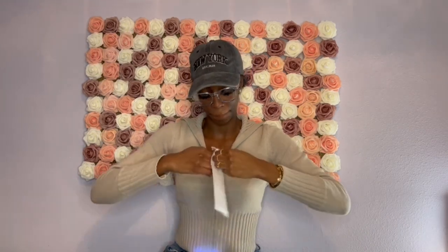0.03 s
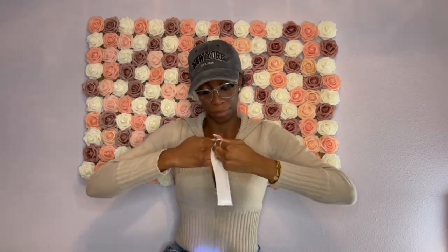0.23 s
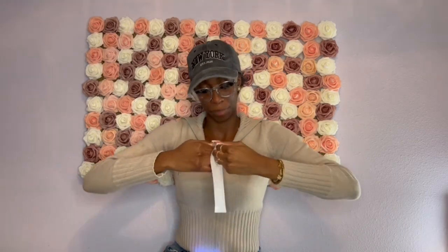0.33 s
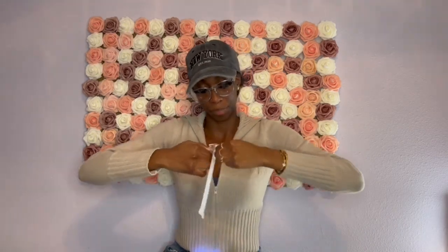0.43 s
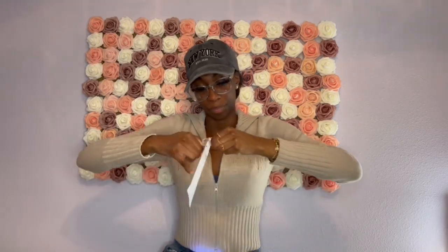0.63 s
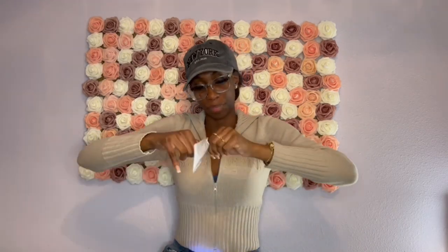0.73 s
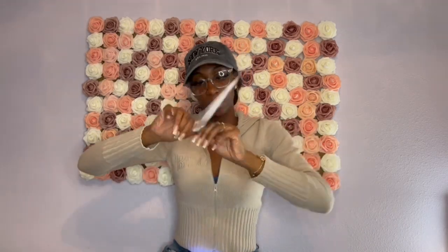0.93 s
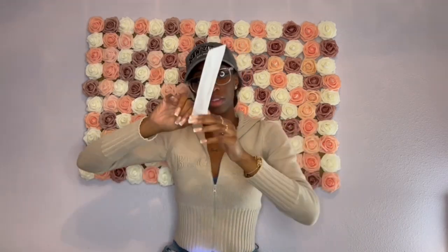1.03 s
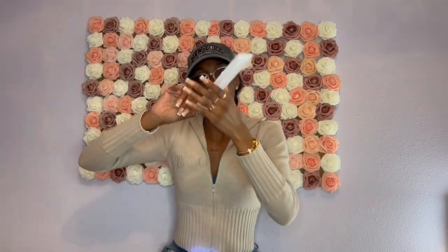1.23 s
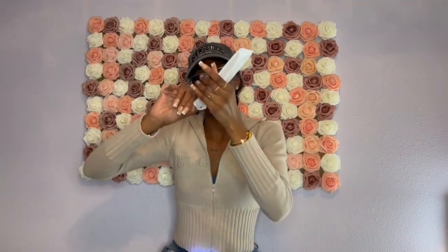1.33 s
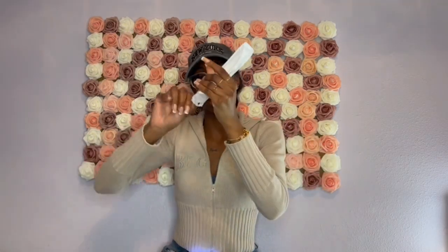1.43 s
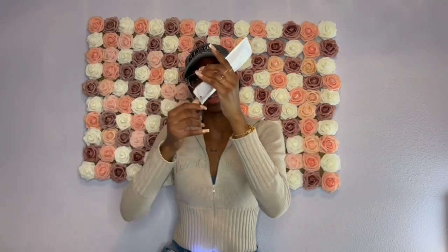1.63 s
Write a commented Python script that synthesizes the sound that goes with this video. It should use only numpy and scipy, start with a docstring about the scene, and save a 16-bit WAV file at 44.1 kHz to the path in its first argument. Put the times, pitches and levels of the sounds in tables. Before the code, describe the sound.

A small stiff plastic packet crinkles in the hands, with light ticks before a loud double snap at 0.23 seconds. More crisp snaps come around 0.46 and from 0.66 to 0.88, then it quiets to faint crackle. From 1.19 to 1.37 dense crunches and rustling build, a sharp snap follows at 1.41, and small dull ticks fade by 1.65. Close stereo, short room tail, faint hiss and low rumble.

```python
"""Plastic packet pulled open

Two hands pull a small packet of stiff film open in a small, bare room, heard by two microphones.
The film buckles in sharp ringing snaps, gives way in crunches made of dense clicks, and rustles
under the fingers as a stream of tiny ringing slips; near the end it scrapes as it is pulled apart.
Near reflections and a short noise tail answer each snap, over filtered-noise hiss and a low rumble."""
import sys
import numpy as np
from scipy import signal
from scipy.fft import rfft
from scipy.io import wavfile
from scipy.ndimage import uniform_filter1d

SR = 44100
rng = np.random.default_rng(int(sys.argv[2]) if len(sys.argv) > 2 else 0)


def unload_audio(sound):
    """Save the sound as a 16-bit wav file, at the path given as the first command line argument."""
    columns = np.transpose(np.atleast_2d(sound))
    # keep every value between -1 and 1, then stretch to whole-number steps
    steps = np.round(np.clip(columns, -1, 1) * 32767)
    wavfile.write(sys.argv[1], SR, steps.astype(np.int16))


N = 74970  # length in samples
HZ = np.fft.rfftfreq(4096, 1 / SR)  # frequency grid for all colours

# Single buckles of the film; the ring is a peak in the spectrum:
# start_s, level_db, pitch_hz, ring_db, width_octaves, bass_db, treble_db_per_octave
FILM_SNAPS = [(0.1262, -14, 5260, 18.5, 1, 11, 15), (.161, -20.5, 5950, 7.5, 0.98, -12, 7),
              (0.1941, -22, 3610, 13, 0.44, -1, -12), (0.23, 0.5, 2900, 9.5, 0.42, 1, 7),
              (0.2352, 0, 3400, 6.5, 0.15, -11, -8.5), (0.2405, -5.5, 6030, 16.5, 0.22, -14, 8),
              (0.364, -30.5, 5040, 4, 0.81, 7, -5), (0.3896, -33, 2520, -3, .6, -3, -12),
              (0.4331, -25.5, 5000, 6, 1, 12, -16), (0.4645, -7, 4050, 9, 0.54, -10, 2),
              (0.468, -13.5, 2470, 10, 0.42, -8.5, -3), (0.6125, -37.5, 3960, 9, 0.64, 0, -1),
              (0.6332, -34.5, 1720, 12, 0.83, 14, -18), (0.6597, -16, 3320, 15, 0.4, 1, -17),
              (0.6597, -17, 2320, 14, .5, -13, -17), (0.7108, -7, 6200, 9.5, 1, -2, 5),
              (0.7954, -7.5, 2920, 7.5, 0.17, -3.5, -5.5), (0.8286, -15, 2790, 21, 0.27, 20, -3),
              (0.848, -18.5, 2840, 18, 0.64, 14, -10), (0.8806, -23, 4000, 28, 0.66, 9, -23),
              (1.1902, -21.5, 3490, 4.5, 0.35, -1, -13), (1.4065, -5, 2300, 3, 0.19, -18, -14.5),
              (1.408, -12, 4260, 7, 0.36, -9, -15.5), (1.4145, -15.5, 3640, 8, 0.86, -1, -7),
              (1.4818, -17.5, 1900, 11, 0.53, 13, -13), (1.5755, -29.5, 2180, 12, 1, 12, -27),
              (1.5869, -21, 4000, 10.5, 0.27, -2.5, -34), (1.626, -27.5, 3160, 10.5, 0.32, -13, -40)]
# Quick runs of tiny creases: start_s, length_s, level_db, bass_db, treble_db_per_octave
CREASE_RUNS = [(0.038, 0.0093, -20.5, 9, 0.5), (0.4622, 0.0017, -16, 2, 5), (0.7938, 0.0031, -15.5, 17, 2),
               (0.8256, 0.0041, -13.5, -6, 3), (0.833, 0.0033, -21, -2, -19),
               (1.014, 0.021, -31.5, -14, -23), (1.062, 0.0065, -28.5, 22.5, 1),
               (1.193, 0.012, -19, -28, -6.5), (1.2428, 0.0082, -10.5, 13, -0.5),
               (1.253, 0.001, -11.5, -8, 3), (1.262, 0.0052, -18.5, -5, 0), (1.29, 0.0046, -10, 16, 1),
               (1.32, 0.0055, -5.5, 8, 0.5), (1.3273, 0.0017, -12.5, 13, -21),
               (1.365, 0.0031, -17, -15, -48)]
# Broad colour shared by snaps and crunches, strongest at 2 to 8 kHz,
# with narrow dips in the treble: frequency_hz, level_db
SHARED_COLOUR = [(60, -16), (200, -14.5), (400, -7), (600, -11), (1000, -4.5), (2000, 3), (3500, 2),
                 (6500, 1), (8500, -0.5), (10300, -9.5), (12200, 1), (13800, -22.5), (15500, 0.5),
                 (17000, -52)]
BASS_HZ, TREBLE_HZ = 834, 6750  # corners of the bass and treble tilts

# Burst of tiny creases round each snap: the burst starts ahead of the main click
SPLINTER_S, SPLINTER_LEAD_S = 0.0012, 0.0003
SPLINTER_SHARE = 3.7  # burst strength against the click, for a facet with a 0 dB ring
CLEAN_DB_PER_DB = 0.4  # the more a facet rings, the less it splinters
CREASES_PER_S, CREASE_SPREAD_DB = 2700, 3.5

# Film rustling under the fingers, level over time: start_s, level_db
RUSTLE_LEVELS = [(0, -42.5), (.03, -56), (.1, -60.5), (.17, -69), (.22, -51.5), (.34, -86), (.45, -58.5),
                 (.55, -88), (.64, -62), (.77, -56.5), (.91, -75), (.95, -56.5), (1.0, -100),
                 (1.066, -52.5), (1.09, -86), (1.18, -81), (1.2, -51.5), (1.23, -52.5), (1.27, -40),
                 (1.35, -53), (1.39, -56), (1.56, -68.5), (1.7, -65)]
# Colour of the rustle: frequency_hz, level_db
RUSTLE_TONE = [(100, -29), (400, -5.5), (1000, 0.5), (2000, 0.5), (4000, 5), (6500, 5), (9000, -9.5),
               (12000, -23), (16000, -17.5)]
RUSTLE_PER_S, RUSTLE_SPREAD_DB = 4900, 4.5
# Duller scraping of film and fingers, level over time: start_s, level_db
SCRAPE_LEVELS = [(0, -61.5), (.11, -60.5), (.16, -77), (.35, -67), (.38, -52.5), (.45, -86), (.57, -78),
                 (.7, -58.5), (.78, -70), (.84, -50), (.9, -64), (1.07, -64), (1.12, -89), (1.235, -79),
                 (1.26, -67), (1.33, -47), (1.39, -68.5), (1.48, -61), (1.55, -53.5), (1.62, -78),
                 (1.7, -68.5)]
# Colour of the scrape: frequency_hz, level_db
SCRAPE_TONE = [(60, -7), (160, 5), (290, -4), (410, 6), (590, 3), (830, 1), (1600, 4.5), (3000, -1),
               (7000, -8), (16000, -43)]
SCRAPE_PER_S, SCRAPE_SPREAD_DB = 4400, 4
GRAIN_HZ, GRAIN_CYCLES = (125.3, 14630), 1.94  # pitch range of the slips, cycles to decay to 1/e

# Nearby surfaces: delay_s, level_db
NEAR_ECHOES = [(.0028, -4), (.0085, -14), (0.0105, -8)]
ECHO_SCATTER_S = 0.0014
# Decay of the diffuse tail: frequency_hz, t60_s
ROOM_DECAY = [(150, 0.52), (500, 0.18), (1200, 0.29), (3000, 0.18), (7000, .23), (15000, 0.086)]
ROOM_DB, ROOM_BUILD_S = -2, 0.0035  # tail level before evening, time to build up
# How alike the tail is at the two microphones: frequency_hz, likeness (0 to 1)
TAIL_LIKENESS = [(330, 0.99), (650, 0.023)]

# Colour of the room hiss: frequency_hz, level_db
HISS_COLOUR = [(20, -13), (50, -4), (85, -3), (130, -11), (300, -14.5), (700, -25.5), (2000, -17.5),
               (6000, -49), (10000, -37), (17000, -40)]
HISS_DB, HISS_SIDE = -72.5, 0.62  # rms level of the middle, side against middle
# Swells of the low rumble: start_s, level_db
RUMBLE_LEVELS = [(0, -66), (.15, -76), (.26, -69.5), (.55, -85), (0.621, -62.5), (.69, -81), (.76, -67),
                 (.9, -73), (1.079, -71), (1.3, -78), (1.38, -62), (1.5, -71.5), (1.7, -75)]
# Colour of the rumble: frequency_hz, level_db
RUMBLE_TONE = [(20, -39), (38, -13.5), (57, 9), (80, 1), (130, -13.5), (400, -54)]

# Balance of the microphones: frequency_hz, left_minus_right_db
LEFT_BALANCE = [(100, 1), (700, 0.3), (1300, 3.5), (3100, 0.5), (4300, 4.5), (6000, 10), (8000, 4.5),
                (12000, -0.5), (16000, -7)]
RIGHT_LAG_SAMPLES, EDGE_HZ = 2, 16600  # right delay, upper band limit


def snaps():
    """A facet pops through and rings for a few cycles, amid a splinter of tiny creases."""
    out = np.zeros(N)
    t = np.arange(512) / SR
    for start_s, level_db, pitch_hz, ring_db, width_octaves, bass_db, treble_db in FILM_SNAPS:
        splinter = unit(rng.standard_normal(len(t)) * t * np.exp(-2 * t / SPLINTER_S))
        push = SPLINTER_SHARE * amp(-CLEAN_DB_PER_DB * ring_db) * splinter
        add(push, SPLINTER_LEAD_S, np.array([-1.]))  # the main click
        octaves_away = np.log2((HZ + 1) / pitch_hz)
        facet_db = ring_db * np.exp(-(octaves_away / width_octaves) ** 2)
        body = ring(tilted_colour(bass_db, treble_db) + facet_db)
        snap = signal.fftconvolve(evened(push, size=90), body)
        add(out, start_s - SPLINTER_LEAD_S, amp(level_db) * unit(snap))
    return out


def crunches():
    """A fold gives way in a brief run of dense creases that swells and dies away."""
    out = np.zeros(N)
    t = np.arange(2048) / SR
    for start_s, length_s, level_db, bass_db, treble_db in CREASE_RUNS:
        swell = np.sqrt(t) * np.exp(-2 * (t / length_s) ** 2)
        run = creases(len(t), CREASES_PER_S, CREASE_SPREAD_DB) * swell
        crunch = signal.fftconvolve(evened(run, size=60), ring(tilted_colour(bass_db, treble_db)))
        add(out, start_s, amp(level_db) * unit(crunch))
    return out


def tilted_colour(bass_db, treble_db):
    """Shared colour in dB with its own tilts: large folds add bass, tight ones treble."""
    bass = bass_db / (1 + (HZ / BASS_HZ) ** 2)
    treble = treble_db * np.log2(np.hypot(1, HZ / TREBLE_HZ))
    return read(SHARED_COLOUR) + bass + treble


def creases(n, per_s, spread_db):
    """Film gives way in random clicks of either sign, a few much larger than the rest."""
    size = amp(spread_db * np.minimum(rng.exponential(1, n), 4))
    return size * rng.choice([-1, 1], n) * (rng.random(n) < per_s / SR)


def friction(levels, colour, per_s, spread_db, count=24):
    """Rubbing is a stream of small slips that ring at count pitches and follow the hands' levels."""
    t = np.arange(2048) / SR
    slips = np.zeros(N)
    for hz in np.geomspace(*GRAIN_HZ, count):
        grain = np.sin(2 * np.pi * hz * t) * np.exp(-hz * t / GRAIN_CYCLES)
        clicks = creases(N, per_s / count, spread_db)
        slips += np.sqrt(hz) * unit(signal.oaconvolve(clicks, grain)[:N])
    coloured = signal.fftconvolve(slips, ring(read(colour)))[:N]
    return level_curve(levels) * np.sqrt(N) * unit(coloured)


def rustle():
    """Film rubs under the fingers in bright, dense slips."""
    return friction(RUSTLE_LEVELS, RUSTLE_TONE, RUSTLE_PER_S, RUSTLE_SPREAD_DB)


def scrape():
    """Film and fingers scrape in duller slips."""
    return friction(SCRAPE_LEVELS, SCRAPE_TONE, SCRAPE_PER_S, SCRAPE_SPREAD_DB)


def room_tails(age):
    """Diffuse tails at two microphones: noise dying at its own rate per pitch, more alike in the bass."""
    clicks = rng.choice([-1., 1.], (2, len(age)))
    hz, t, (a, b) = signal.stft(clicks, SR, nperseg=256)
    same = np.clip(read(TAIL_LIKENESS, hz), 0, 1)[:, None]
    pair = np.array([a, same * a + np.sqrt(1 - same ** 2) * b])
    decay = amp(-60 * t / read(ROOM_DECAY, hz)[:, None])
    return signal.istft(pair * decay, SR)[1][:, :len(age)]


def room(x):
    """Direct sound, a few scattered near reflections and a short diffuse tail, at two microphones."""
    age = np.arange(SR // 2) / SR
    out = []
    for tail in room_tails(age):
        response = amp(ROOM_DB) * unit(tail * (1 - np.exp(-age / ROOM_BUILD_S)))
        response[0] += 1  # direct sound
        for delay_s, level_db in NEAR_ECHOES:
            scatter = unit(rng.standard_normal(len(age)) * np.exp(-age / ECHO_SCATTER_S))
            add(response, delay_s, amp(level_db) * scatter)
        out.append(signal.fftconvolve(x, evened(response, size=18))[:N])
    return np.array(out)


def hiss():
    """Faint steady room noise, partly different on the two sides."""
    mid = noise(HISS_COLOUR)
    side = HISS_SIDE * noise(HISS_COLOUR)
    return amp(HISS_DB) * np.array([mid + side, mid - side])


def rumble():
    """Low noise that swells and sinks, the same on both sides."""
    return level_curve(RUMBLE_LEVELS) * noise(RUMBLE_TONE)


def noise(colour):
    """Steady noise of the given colour, rms one."""
    return np.sqrt(N) * unit(signal.fftconvolve(rng.standard_normal(N), ring(read(colour)))[:N])


def evened(x, size):
    """Flattens the broad colour of a burst (over size bins), keeps its fine grain, energy one."""
    power = uniform_filter1d(abs(rfft(x, 8 * 4096)) ** 2, 8 * size)[::8]
    flatten = ring(-10 * np.log10(abs(power) + 1e-9))
    return unit(signal.fftconvolve(x, flatten)[:len(x)])


def ring(db):
    """Causal, minimum-phase impulse response with the given spectrum."""
    half = np.log(amp(db))
    full = np.concatenate([half, half[-2:0:-1]])
    return np.fft.ifft(np.exp(np.conj(signal.hilbert(full)))).real[:len(half)]


def read(points, hz=HZ):
    """Reads a table on a log-frequency axis."""
    f, value = np.transpose(points)
    return np.interp(np.log(hz + 1), np.log(f + 1), value)


def level_curve(points):
    """Gain over time, drawn in straight dB lines between the points."""
    return amp(np.interp(np.arange(N) / SR, *np.transpose(points)))


def add(mix, s, sound):
    """Mixes a sound in at time s."""
    part = mix[max(round(s * SR), 0):][:len(sound)]
    part += sound[:len(part)]


def amp(db):
    """Decibels to gain."""
    return 10 ** (np.asarray(db) / 20)


def unit(x):
    """Scales to an energy of one."""
    return x / np.sqrt(np.sum(x ** 2) + 1e-20)


def scene():
    """Snaps, crunches and rubbing each sound in the room with separately drawn echoes and tail."""
    packet = room(snaps()) + room(crunches()) + room(rustle() + scrape())
    return packet + hiss() + rumble()


def record(dry):
    """The left microphone is mostly brighter and hears slightly earlier; then the band limit."""
    half_db = read(LEFT_BALANCE) / 2
    left = signal.fftconvolve(dry[0], ring(half_db))[:N]
    late = np.pad(dry[1], (RIGHT_LAG_SAMPLES, 0))
    right = signal.fftconvolve(late, ring(-half_db))[:N]
    edge = signal.firwin(511, EDGE_HZ, window=("kaiser", 9), fs=SR)
    return signal.oaconvolve(np.array([left, right]), edge[None], "same", axes=1)


dry = scene()
out = record(dry)
unload_audio(out)
```